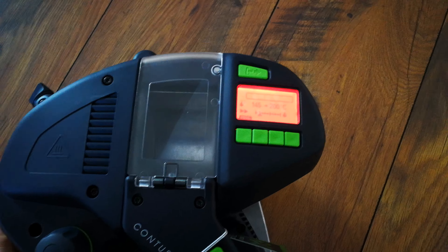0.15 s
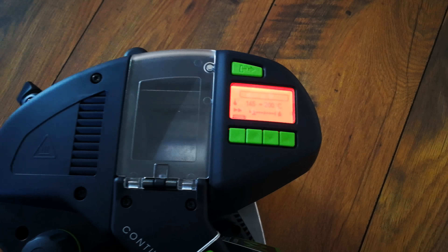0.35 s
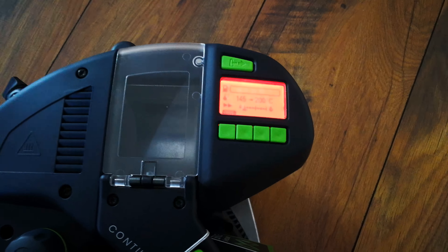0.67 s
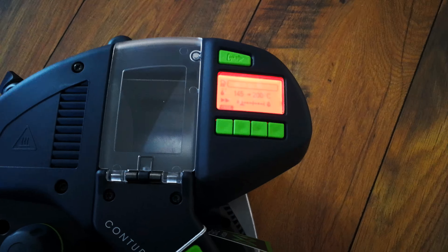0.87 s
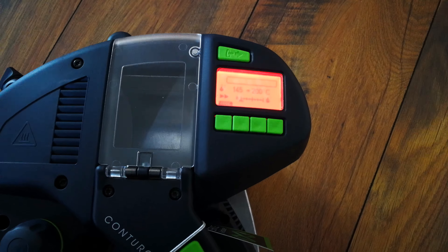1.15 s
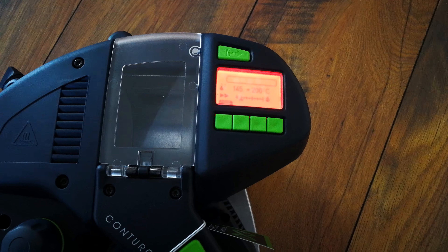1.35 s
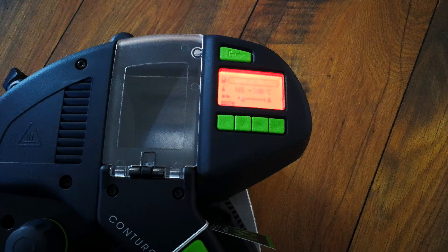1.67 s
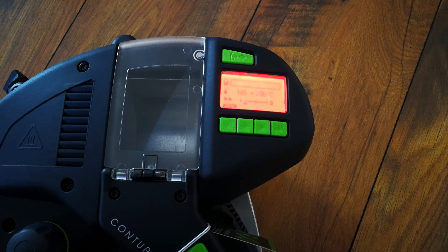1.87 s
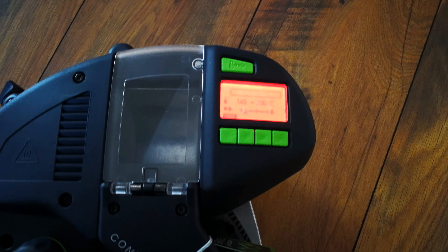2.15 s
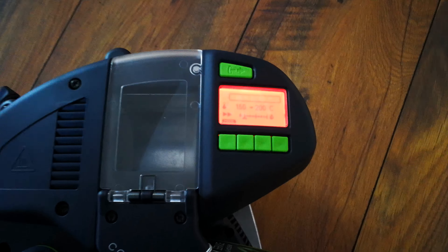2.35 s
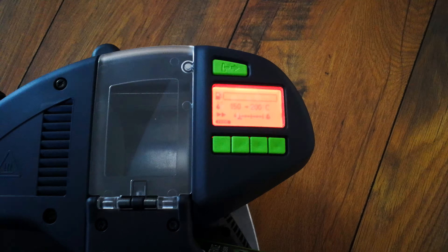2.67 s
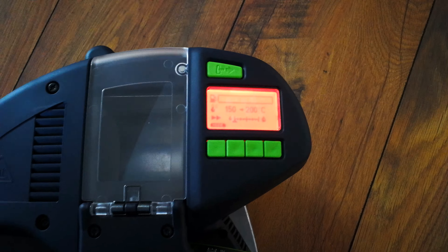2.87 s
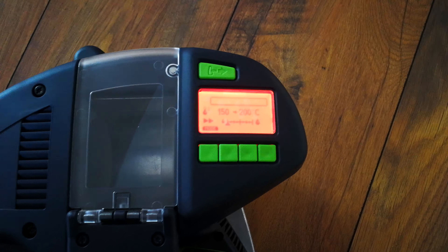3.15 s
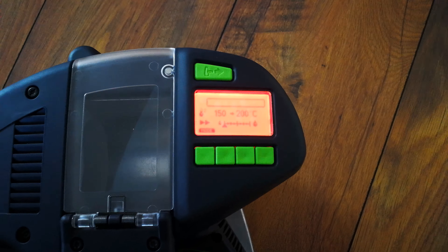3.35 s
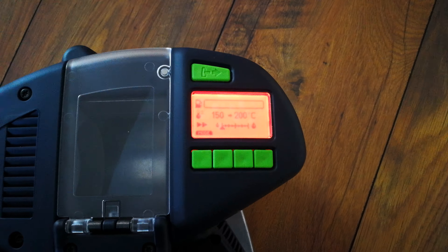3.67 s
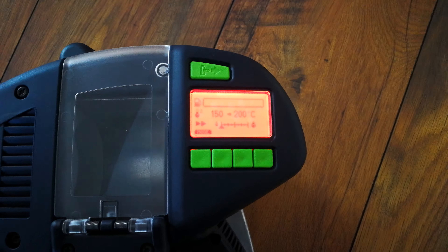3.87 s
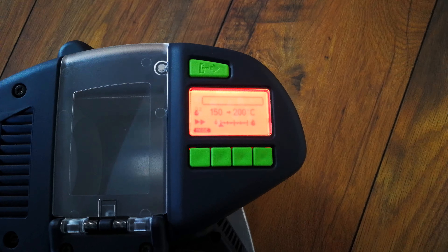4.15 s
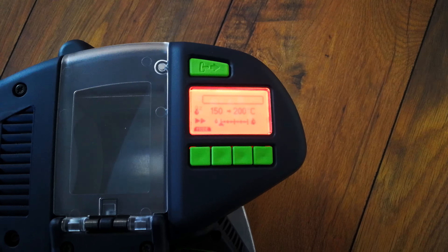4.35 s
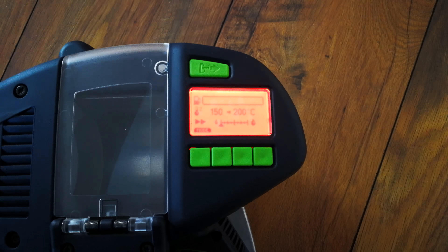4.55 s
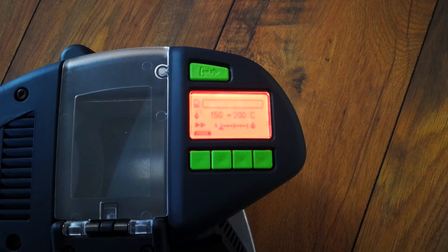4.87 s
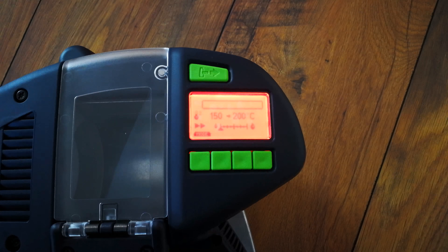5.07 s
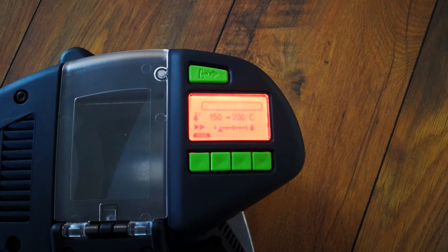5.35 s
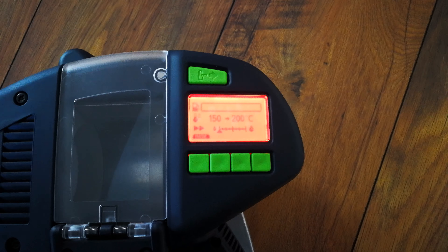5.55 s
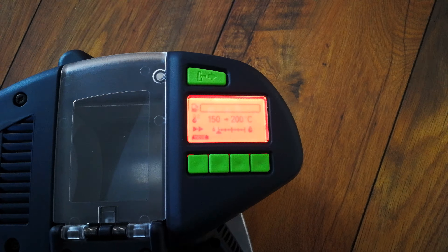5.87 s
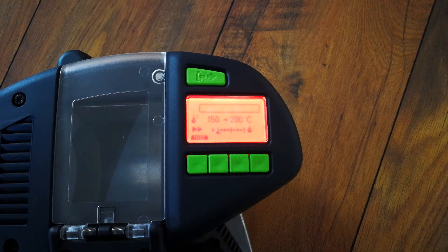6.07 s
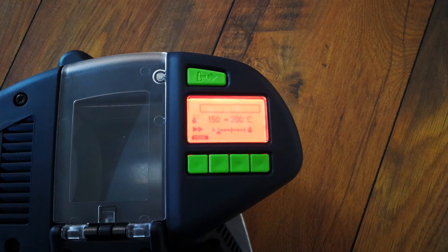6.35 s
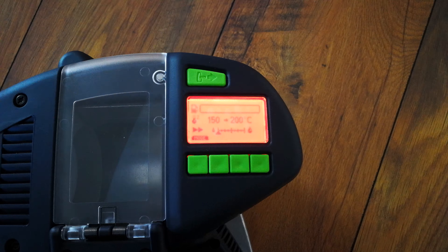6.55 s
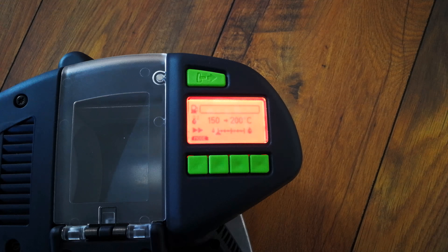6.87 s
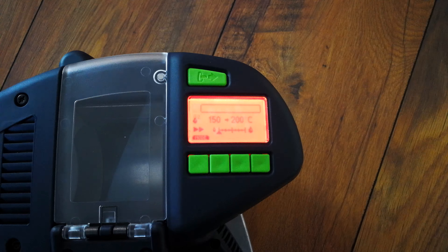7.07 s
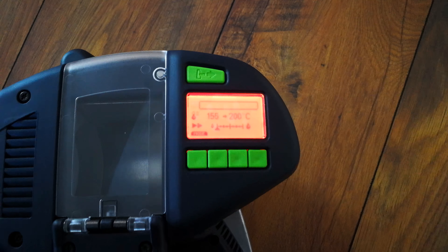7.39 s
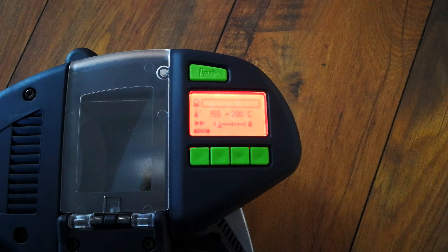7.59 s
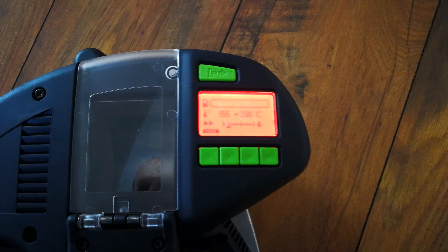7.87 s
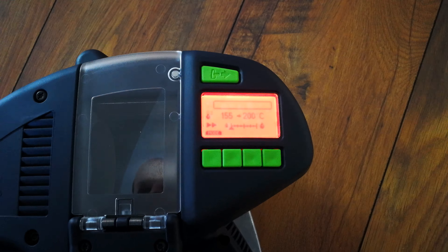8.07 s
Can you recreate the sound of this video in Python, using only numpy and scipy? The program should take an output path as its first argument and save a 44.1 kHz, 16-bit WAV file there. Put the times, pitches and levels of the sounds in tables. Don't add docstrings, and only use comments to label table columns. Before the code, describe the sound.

A small fan-driven hand tool runs steadily up close indoors, rushing airy hiss with a thin high whine, plus one very faint soft knock at the start.

```python
import sys
import numpy as np
from scipy import signal
from scipy.fft import rfft, irfft, next_fast_len
from scipy.io import wavfile
from scipy.ndimage import uniform_filter1d

SR = 44100
rng = np.random.default_rng(int(sys.argv[2]) if len(sys.argv) > 2 else 0)


def volts_from_decibels(level):
    exponent = np.asarray(level, float) / 20
    return 10 ** exponent


def unload_wav(signal):
    wavfile.write(
        sys.argv[1],
        SR,
        np.round(np.clip(np.atleast_2d(signal).T, -1, 1) * 32767).astype(np.int16),
    )


N = 362502

# centre_s, length_s, rise_db
MOTOR_SWELLS = [(.15, .4, 8), (2.2, .5, 9), (5.3, .4, 8), (6.85, 2.3, 20), (7.72, .2, 7), (8.2, 0.11, 12)]
# centre_s, length_s, rise_db
RUMBLE_SWELLS = [(.25, .3, 5), (2.2, .35, 15), (5.3, .3, 9), (6.3, 0.19, 4), (6.93, 0.23, 7), (7.3, .3, 13),
                 (7.75, .25, 12)]
# time_s, peak_db, push_ms
KNOCKS = [
    (.149, -49, 1.2),
]
# pitch_hz, level_db (per Hz)
RUSH_LEFT = [(25, -89), (45, -94.5), (100, -92), (200, -82.5), (500, -74.5), (1000, -88.5), (2000, -77.5),
             (3500, -92), (6000, -95), (9000, -95.5), (12000, -88.5), (15000, -105.0)]
RUSH_RIGHT = [(25, -89), (45, -93.5), (100, -98), (200, -89.5), (500, -78), (1000, -69), (2000, -64.5),
              (3500, -101.5), (6000, -99), (9000, -90.5), (12000, -103.7), (15000, -105.6)]
# pitch_hz, width_hz, level_db
HOLLOWS_LEFT = [(168, 77, -7), (495, 170, -10), (679, 122, -12), (980, 267, 13), (1220, 82, -3),
                (1606, 88, 8), (2164, 516, -10.5), (2295, 370, 12.5), (2700, 1080, 6), (3865, 350, 10),
                (4336, 320, -9), (4497, 990, 13.5), (10541, 522, -3), (11300, 3500, -16)]
HOLLOWS_RIGHT = [(292, 83, 5), (405, 240, 3), (570, 170, -19), (982, 39, -11), (1114, 54, -15),
                 (1277, 484, -8), (1804, 60, 6), (1986, 46, -9.5), (2370, 110, -3), (3360, 170, 4.5),
                 (4590, 730, 11), (5410, 1610, 6.5), (6414, 850, 11), (9500, 230, -2), (10090, 410, 8),
                 (11370, 930, 7)]
# pitch_hz, shared_part (0-1), right_leads_rad
LIKENESS = [(302, 1, -1.3), (450, 0.68, 0.5), (567, 0, 2), (787, 0.98, 0.54), (852, 0.97, -1.6),
            (1580, 0.67, 0.2), (1870, 0.7, 1.17), (2020, 0, -2.5), (2240, 0.77, -1.87), (3200, 0.36, 0.7),
            (3900, 0.5, -0.8), (4670, 0.45, -1.77), (6450, 0.05, -0.5), (10100, 0.12, -1.1),
            (11400, .1, -2.5), (12500, 0.1, 3), (13600, 0.2, -1.5)]
# time_s, nearness_db, aim_db (right port at the whine), tilt_db (left port to the grille)
HAND = [(0.1, -0.5, -8.5, -9), (0.3, -0.8, -8, 0), (0.8, -1, -8, -0.5), (2.05, -1, -9.5, 0),
        (2.55, -0.8, -6, 6), (2.8, -0.3, -3.5, 2.5), (3.05, 0.2, -0.5, 6), (3.55, 0.1, 3, 1.5),
        (3.8, 0.4, 5, -2), (4.05, 0.5, 2, -4), (4.3, 0, 3.5, 0), (4.55, 0.14, -0.5, 2),
        (5.55, 0.22, 0, 1.5), (6.4, 0.2, -1, -2.5), (7.05, 0.5, -1, 1), (7.55, 1, -2.5, -3.5),
        (7.8, 0.25, -2, 1.5), (8.15, 0.5, -4, -2)]
# order (of blade rate), left_db, right_db,
# left_rise and right_rise (dB per dB of nearness), left_leads_rad
FAINT_TONES = [
    (1, -65, -69, 3, 1.5, .04),
    (3, -120, -62.5, 0, -3, 1.04),
    (4, -120, -82, 0, .6, .9),
    (5, -79, -80, .6, .6, 2.9),
    (6, -82, -80, .6, .6, -.9),
]
SECOND_FAN_TONES = [
    (2, -79, -76, 14, 10, 0),
    (3, -72, -72, 6.5, -1, 0.97),
    (7, -55, -64, -0.8, -6.5, 0.51),
    (14, -63, -61, .1, 8, 0),
]

BLADE_HZ, OTHER_BLADE_HZ, BLADES = 973.33, 994.7, 7
HUM_HZ, MAINS_HZ = 61.2, 119.8
MAINS_DB, MOTOR_DB, RUMBLE_DB = -77, -85.5, -2
ROOM_T60_S, ROOM_DB = 0.25, -14
OFFSET = -0.0003
SECOND_RIGHT_DB, SECOND_LEFT_DB, THIRD_LEFT_DB, FOURTH_LEFT_DB = -36.5, -56.5, -52.5, -58.5
LEFT_PER_AIM, FOURTH_PER_NEAR = -0.8, 3
WANDER_DB = -1
HOLLOW_PER_AIM, HOLLOW_PER_NEAR, HOLLOW_PER_TILT, UPPER_PER_NEAR = 0.84, 2.1, 0.52, 2.5
QUIET_AIM_DB = -8
OPPOSED_HZ, OPPOSED_WIDTH_HZ, OPPOSED_SHARE = 12500, 1100, 0.62


def curves(table):
    s, *columns = np.transpose(table)
    return [np.interp(np.arange(N) / SR, s, c) for c in columns]


def walk(rate_hz):
    k = int(SR / rate_hz)
    steps = np.repeat(rng.standard_normal(N // k + 1), k)
    return 1.311 * uniform_filter1d(uniform_filter1d(steps, k), k)[:N]


def swells(rows):
    t = np.arange(N) / SR
    return sum(db * np.exp(-(2 * (t - s) / length) ** 4) for s, length, db in rows)


def turning(hz, wander_hz, rate_hz):
    return 2 * np.pi * np.cumsum(hz + wander_hz * walk(rate_hz)) / SR


def tone(phase, left_db, right_db, lead_rad, flutter_db):
    flutter = flutter_db * walk(6)
    left = volts_from_decibels(left_db + flutter) * np.sin(phase + lead_rad)
    right = volts_from_decibels(right_db + flutter) * np.sin(phase)
    return np.sqrt(2) * np.array([left, right])


def bell(f, hz, width_hz):
    return 1 / (1 + (2 * (f - hz) / width_hz) ** 2)


def colour(f, points, hollows):
    hz, db = np.transpose(points)
    total = np.interp(np.log(f + 1), np.log(hz), db)
    total += sum(d * bell(f, h, w) for h, w, d in hollows)
    total += 5.1 * bell(f, 30, 14)
    total -= 9.5 * bell(f, 11, 12)
    return volts_from_decibels(total) * np.sqrt(SR / 2)


def swell(spectrum, shape, db):
    return (volts_from_decibels(db) - 1) * irfft(spectrum * shape)[:N]


def room(size):
    t = np.arange(SR // 2) / SR
    tail = rng.standard_normal(len(t)) * np.exp(-np.log(1000) * t / ROOM_T60_S)
    tail *= t > 0.003
    tail *= volts_from_decibels(ROOM_DB) / np.sqrt(np.sum(tail ** 2))
    return (1 + rfft(tail, size)) / np.sqrt(1 + volts_from_decibels(2 * ROOM_DB))


def house():
    motor_db = MOTOR_DB + swells(MOTOR_SWELLS) - 2.5
    motor = tone(turning(HUM_HZ, 1.93, 4), motor_db, motor_db, 0, 2)
    mains = tone(turning(MAINS_HZ, 0.063, 1), MAINS_DB, MAINS_DB, 0, 1.1)
    return motor + mains


def knock():
    out = np.zeros(N)
    for s, db, push_ms in KNOCKS:
        u = (np.arange(N) / SR - s) * 1000 / push_ms
        dip = np.exp(-u ** 2)
        swing_back = 0.55 * np.exp(-((u - 2.1) / 1.1) ** 2)
        out += volts_from_decibels(db) * (swing_back - dip)
    return out


def air_at_ports(f, size):
    first, second = rfft(rng.standard_normal((2, size)))
    hz, share, lead = np.transpose(LIKENESS)
    share = np.clip(np.interp(f, hz, share, left=0.99), 0, 1)
    turn = np.exp(1j * np.interp(f, hz, lead, left=0))
    right = share * turn * first + np.sqrt(1 - share ** 2) * second
    echoes = room(size)
    left = first * colour(f, RUSH_LEFT, HOLLOWS_LEFT) * echoes
    return left, right * colour(f, RUSH_RIGHT, HOLLOWS_RIGHT) * echoes


def rush():
    size = next_fast_len(N + N % 2, real=True) // 2 * 2
    f = np.arange(size // 2 + 1) * SR / size
    left, right = air_at_ports(f, size)
    near, aim, tilt = curves(HAND)
    out = []
    for port in (left, right):
        bass = 1 / (1 + (f / 48) ** 6)
        sound = irfft(port)[:N] + swell(port, bass, RUMBLE_DB + swells(RUMBLE_SWELLS))
        for hz in (4500, 7200, 11500):
            band = np.exp(-(np.log2(f / hz + 1e-9) / 0.4) ** 2)
            flutter_db = 0.5 * walk(4.1) + 0.42 * walk(14)
            sound = sound + swell(port, band, 0.95 * near + flutter_db)
        out.append(sound)

    out[0] += swell(left, bell(f, 2480, 650), HOLLOW_PER_NEAR * near + HOLLOW_PER_TILT * tilt)
    out[0] += swell(left, bell(f, 3800, 450), UPPER_PER_NEAR * near - 1.1 + 1.2 * walk(3))
    out[0] += swell(left, bell(f, 12800, 1800), near)
    out[1] += swell(right, bell(f, 2027, 205), HOLLOW_PER_AIM * np.abs(aim - QUIET_AIM_DB) - 5.0)
    out[1] += swell(right, bell(f, 6300, 510), UPPER_PER_NEAR * near)

    opposed = OPPOSED_SHARE * np.clip(1 + near, 0, 1)
    narrow = bell(f, OPPOSED_HZ, OPPOSED_WIDTH_HZ) ** 2
    out[1] -= opposed * irfft(left * narrow)[:N]
    out[1] -= (1 - np.sqrt(1 - opposed ** 2)) * irfft(right * narrow)[:N]

    throb = np.sin(turning(BLADE_HZ / BLADES, 0.032, 0.95))
    out[1] += swell(right, bell(f, 1900, 900), 1.1 * throb + 0.7 * walk(4))
    return np.array(out)


def fans():
    near, aim, tilt = curves(HAND)
    second_right = SECOND_RIGHT_DB + aim
    second_left = SECOND_LEFT_DB + LEFT_PER_AIM * aim + WANDER_DB * walk(3.06)
    third_left = THIRD_LEFT_DB + tilt
    fourth_left = FOURTH_LEFT_DB + FOURTH_PER_NEAR * near + WANDER_DB * walk(4.09)
    blade = turning(BLADE_HZ, 0.2164, 2.5)
    other_shaft = turning(OTHER_BLADE_HZ / BLADES, 0.1148, 1.5)

    out = tone(2 * blade, second_left, second_right, 0.29, 0.62)
    out[0] += np.sqrt(2) * volts_from_decibels(third_left) * np.sin(3 * blade + 1.3)
    out[0] += np.sqrt(2) * volts_from_decibels(fourth_left) * np.sin(4 * blade + 1.3)
    for phase, lines in ((blade, FAINT_TONES), (other_shaft, SECOND_FAN_TONES)):
        for order, left_db, right_db, left_rise, right_rise, lead in lines:
            left_now, right_now = left_db + left_rise * near, right_db + right_rise * near
            out += tone(order * phase, left_now, right_now, lead, 1.0)
    return out


def scene():
    return house() + knock() + rush() + fans()


def low_pass(x):
    return signal.sosfilt(signal.butter(12, 15740, fs=SR, output="sos"), x)


def record(dry):
    mix = dry + OFFSET
    return low_pass(mix)


dry = scene()
out = record(dry)
unload_wav(out)
```